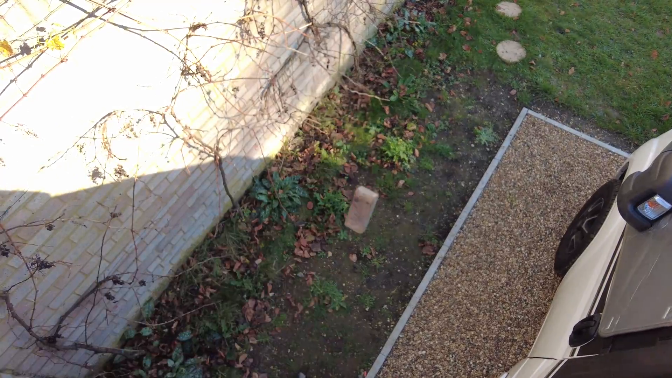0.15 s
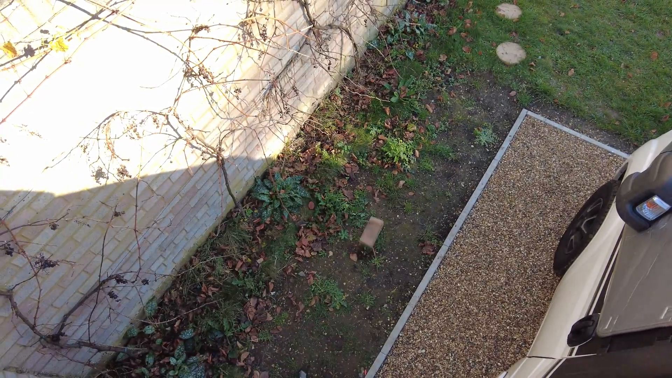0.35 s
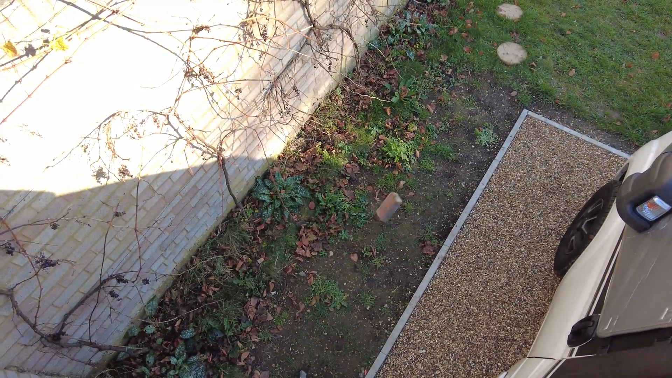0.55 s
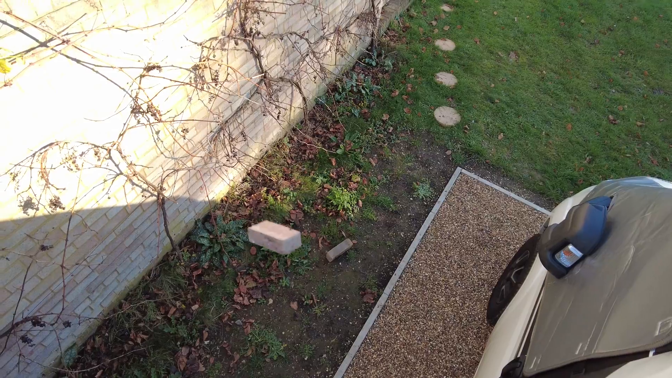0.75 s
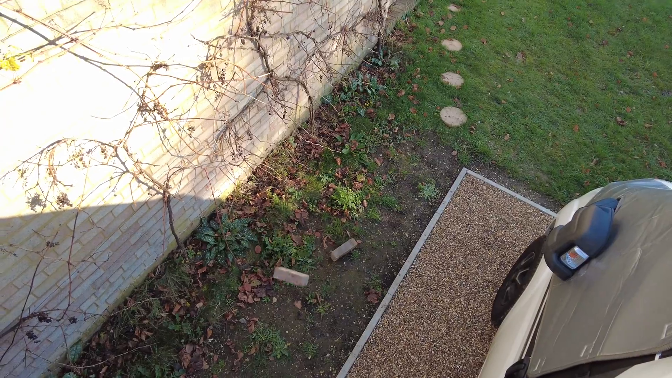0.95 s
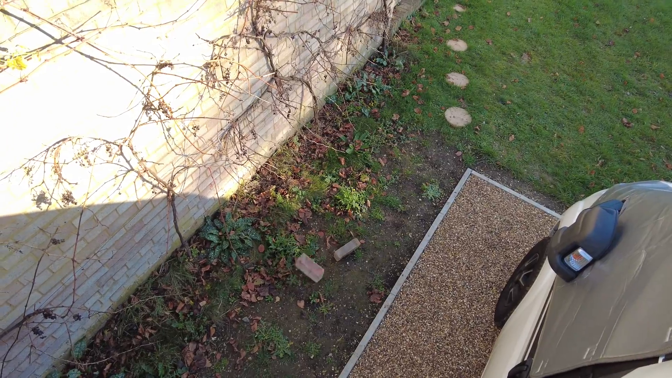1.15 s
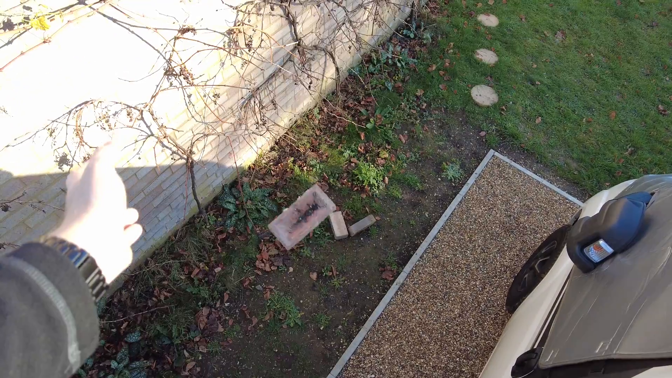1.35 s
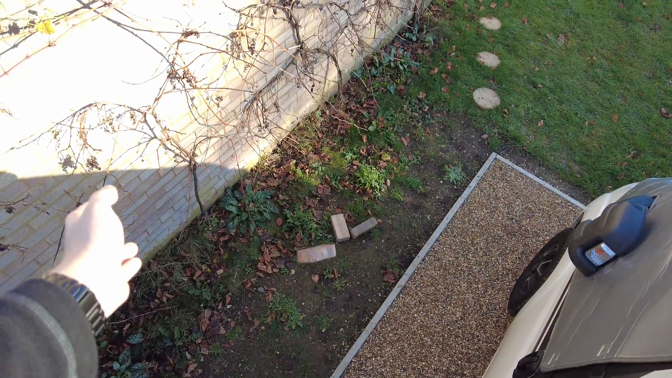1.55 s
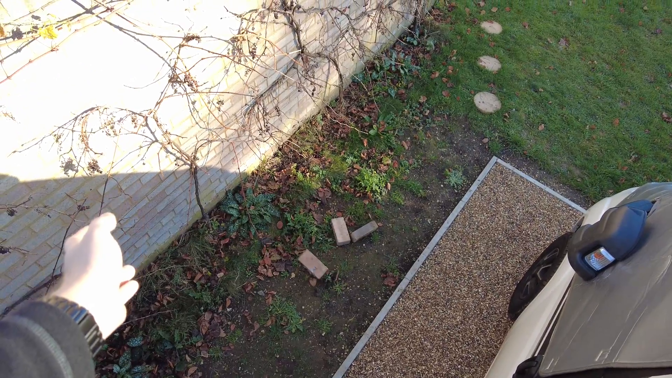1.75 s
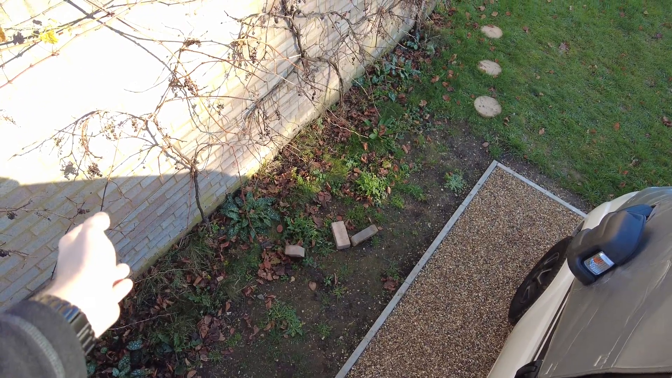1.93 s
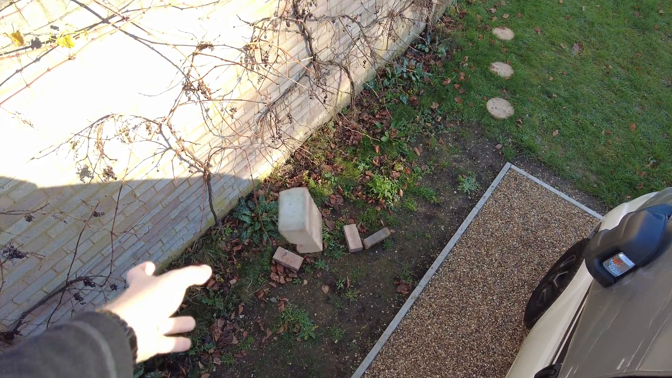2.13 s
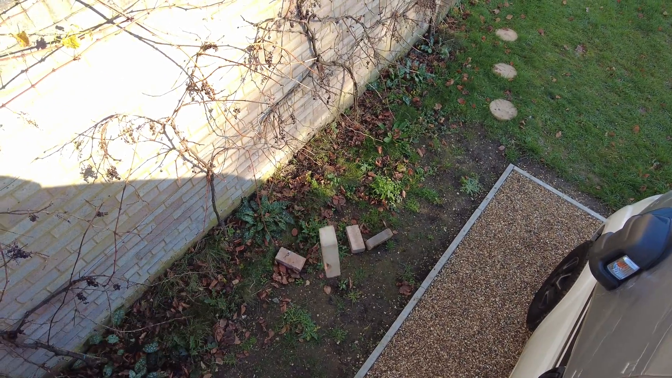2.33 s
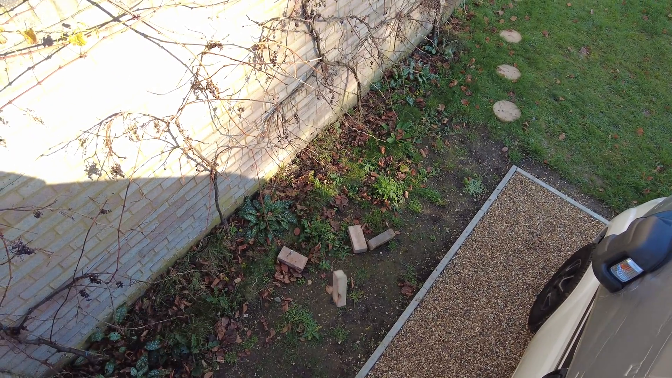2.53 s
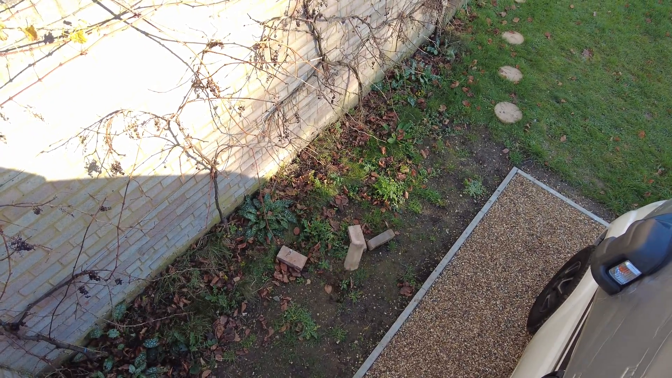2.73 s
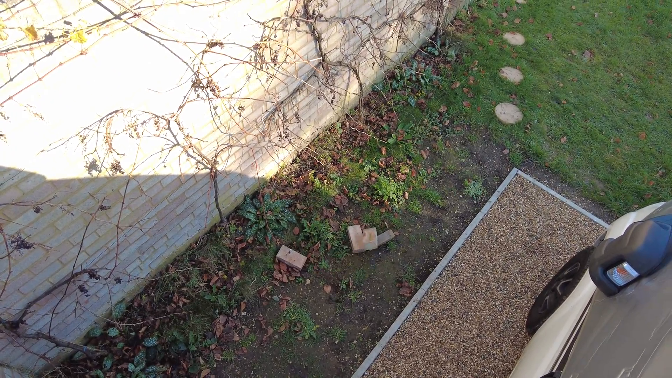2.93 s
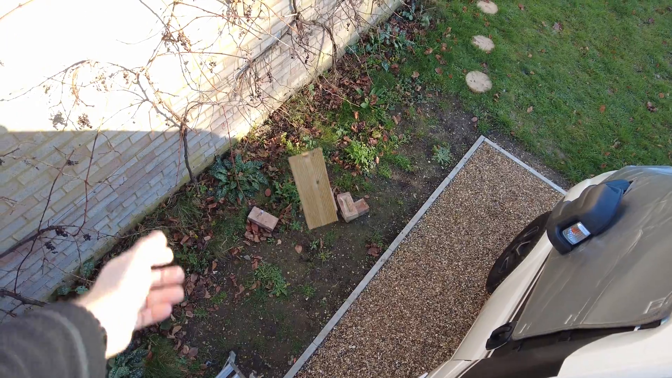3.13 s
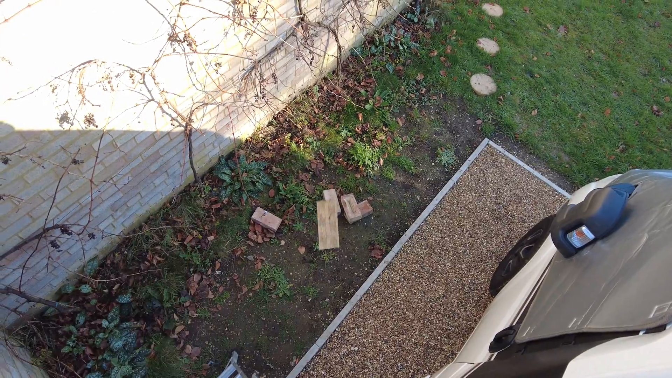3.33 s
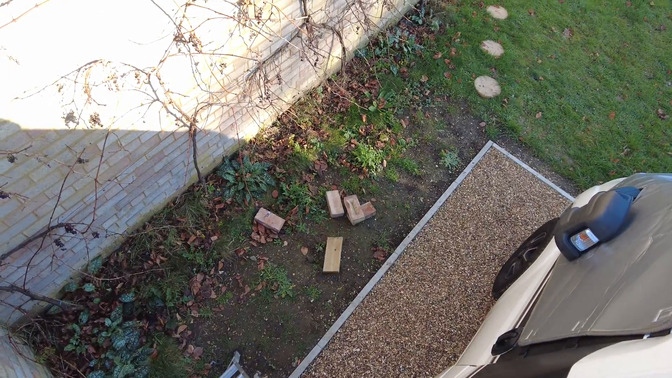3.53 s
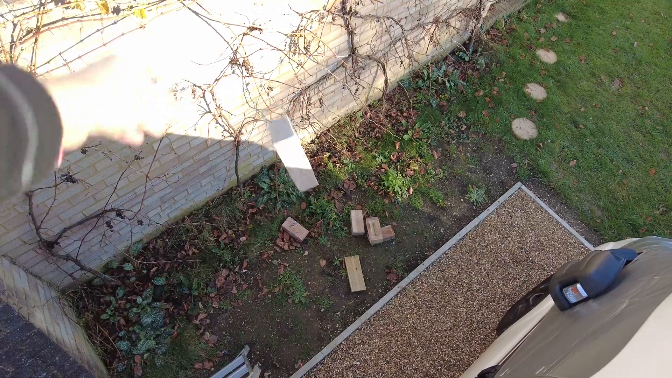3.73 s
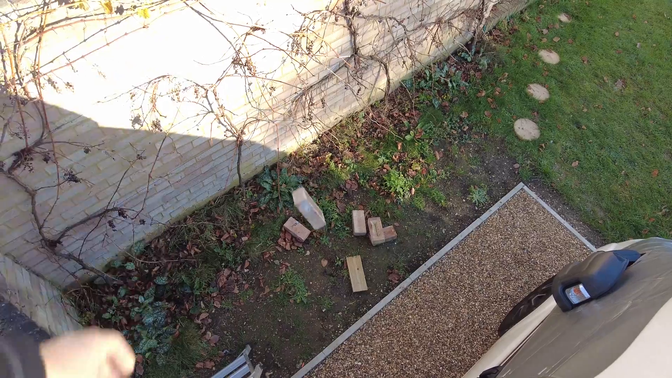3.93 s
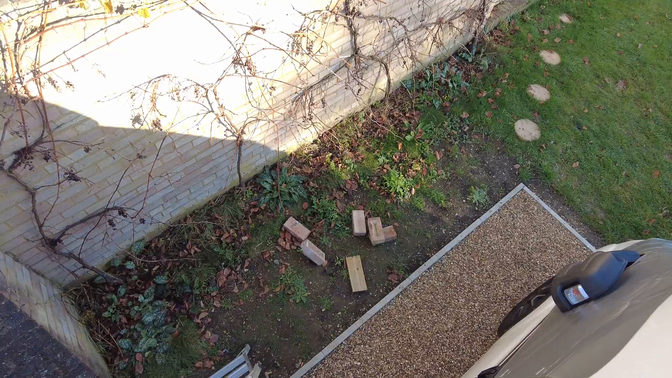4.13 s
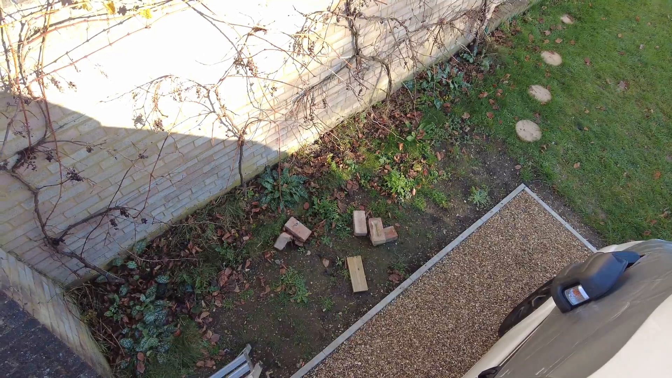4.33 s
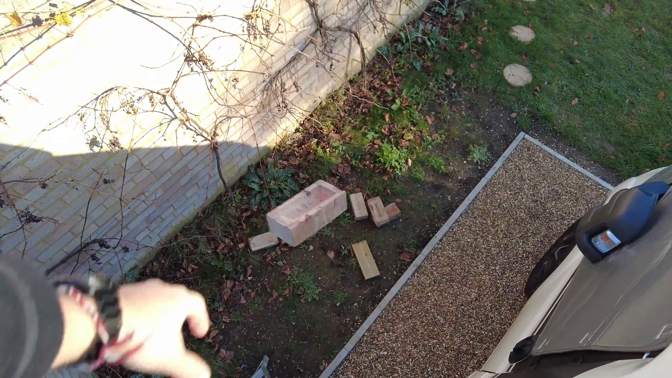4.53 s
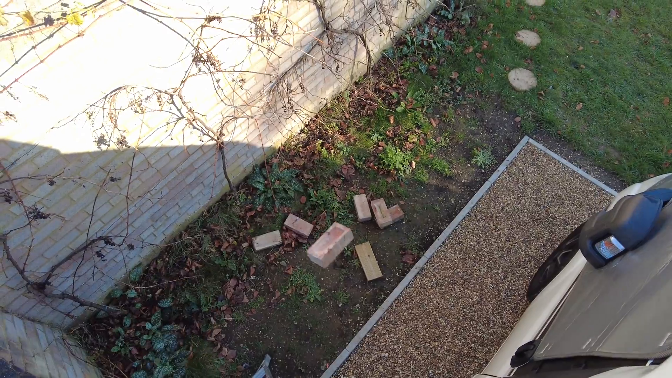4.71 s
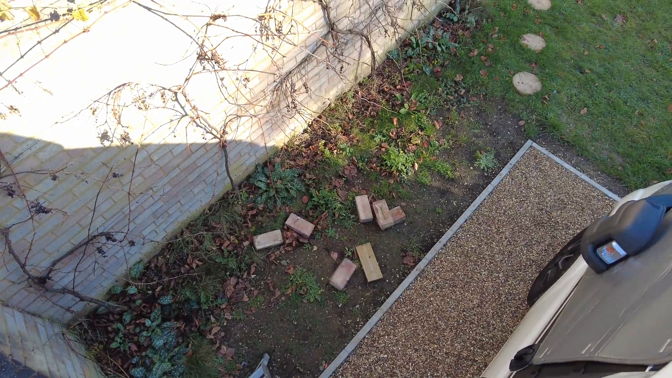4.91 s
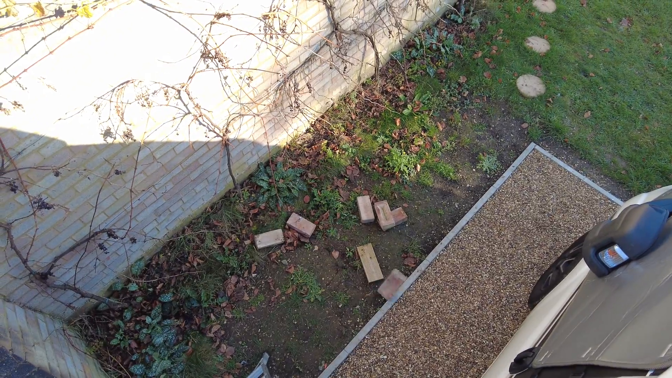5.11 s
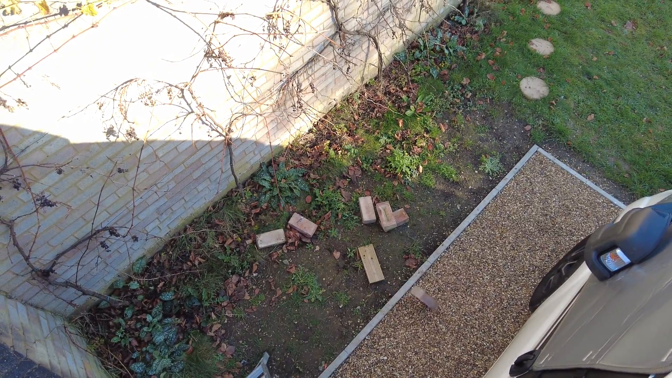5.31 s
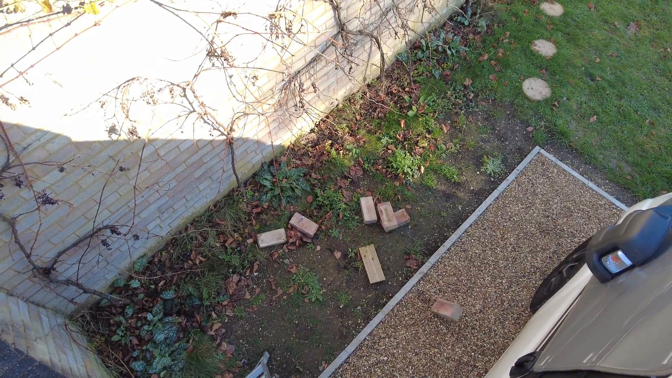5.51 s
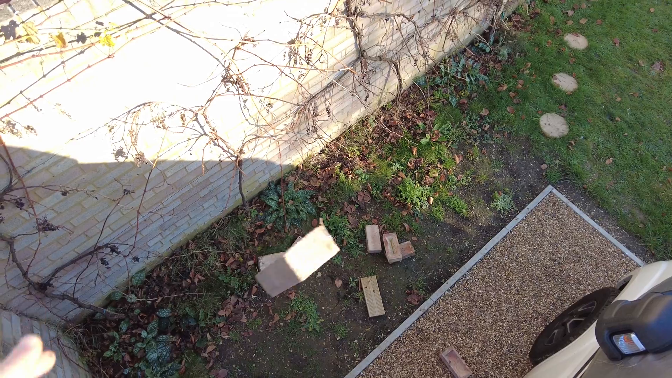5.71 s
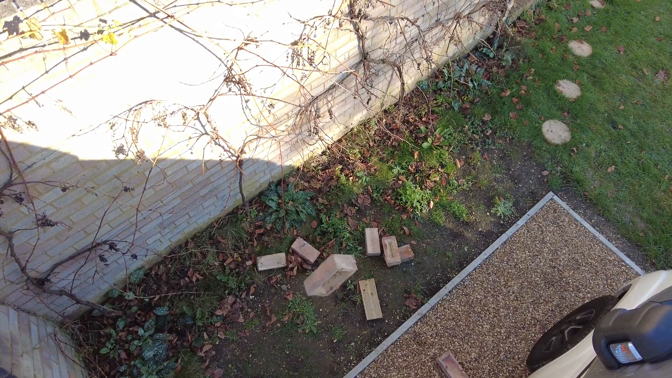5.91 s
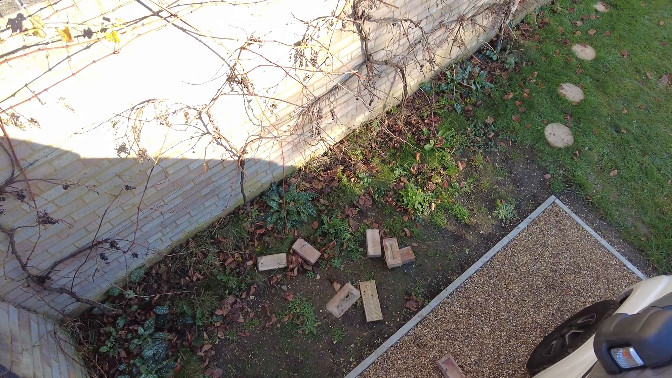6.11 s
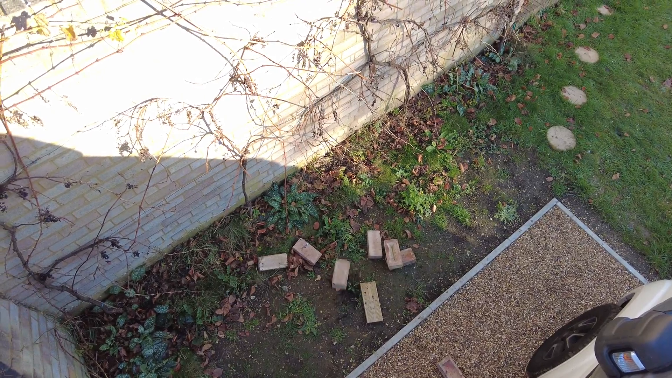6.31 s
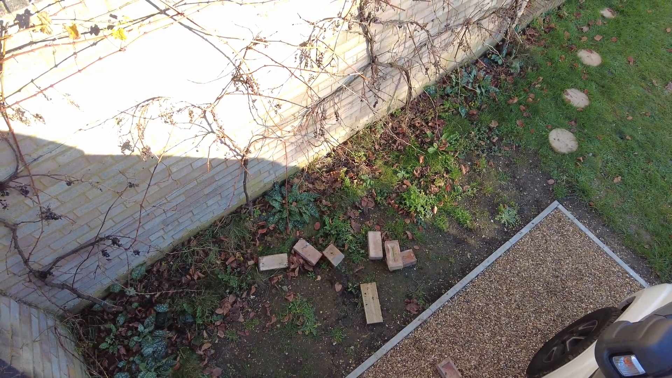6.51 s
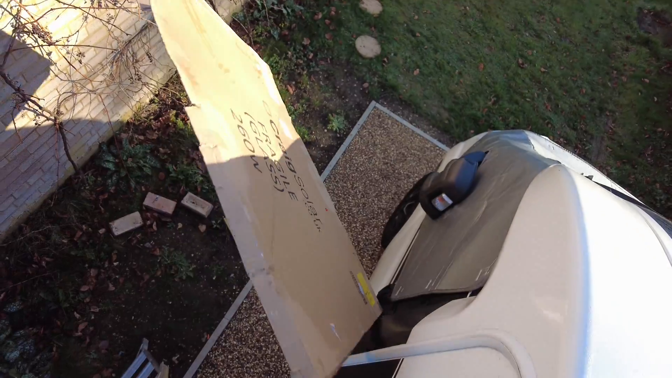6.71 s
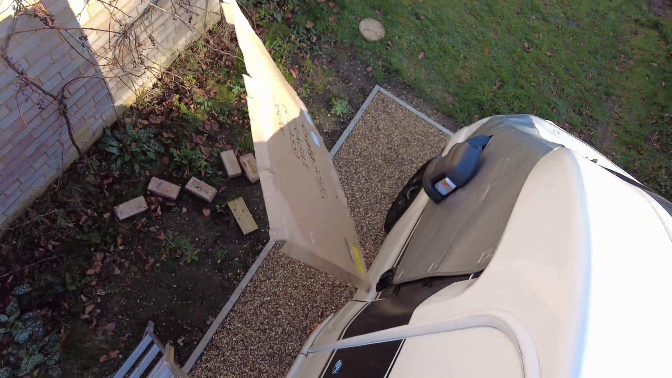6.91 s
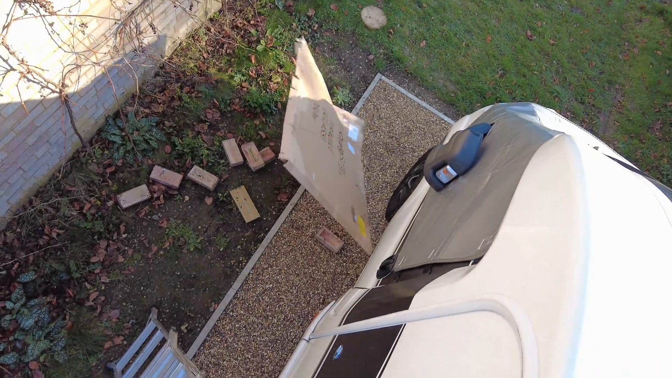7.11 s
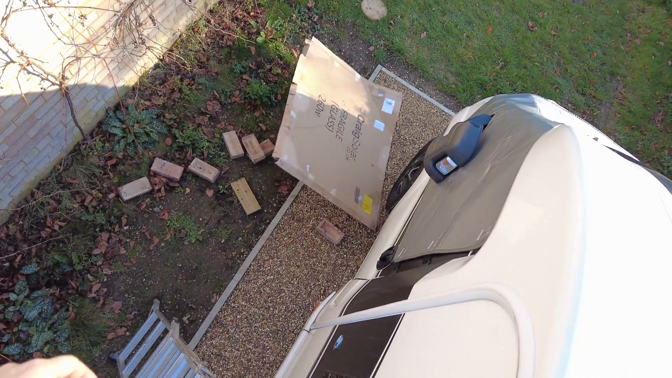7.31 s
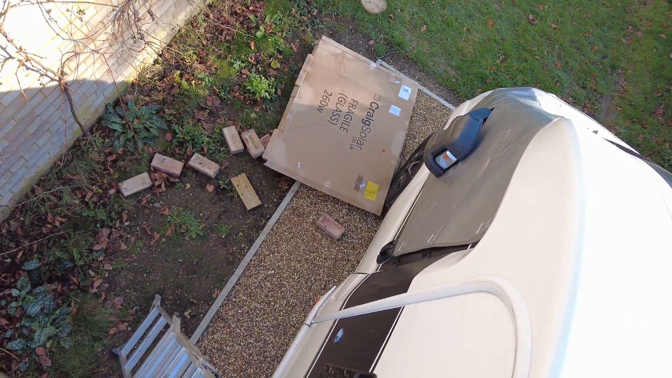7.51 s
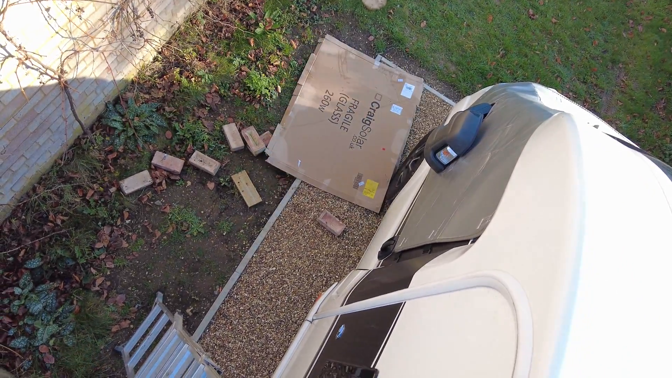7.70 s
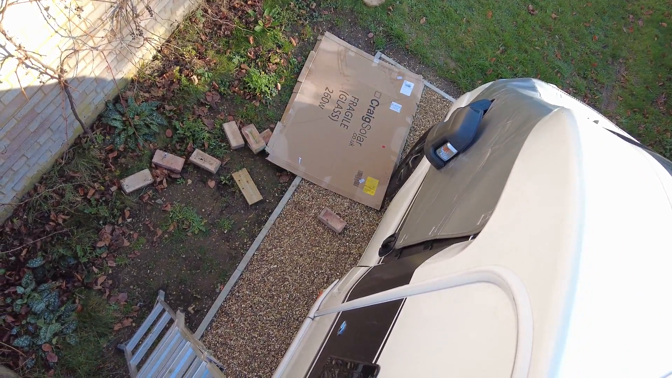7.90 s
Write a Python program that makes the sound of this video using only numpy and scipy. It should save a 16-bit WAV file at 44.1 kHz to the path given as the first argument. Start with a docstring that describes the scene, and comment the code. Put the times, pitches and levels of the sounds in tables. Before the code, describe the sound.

Bricks and a timber piece thud onto soil one after another with clinks, under buffeting wind, then a big cardboard sheet slaps down on gravel.

```python
"""Yard below a roof: bricks, a piece of timber and a big cardboard sheet land on soil and gravel, in hard-cut shots.
Landings are swinging thumps plus coloured grain bursts for slap and grit; hard contacts ring each brick's own modes.
Gravel sprays and the sheet are shaped grains with ticks or panel modes; yard walls add a short echo.
Wind noise that brightens with level buffets over a drone, traffic and hiss; the loudest peaks clip."""
import sys
import numpy as np
from scipy import signal
from scipy.fft import rfft, irfft, next_fast_len
from scipy.io import wavfile
from scipy.ndimage import uniform_filter1d

SR = 44100
rng = np.random.default_rng(int(sys.argv[2]) if len(sys.argv) > 2 else 0)


def output_pcm(signal):
    """Save a mono or channel-first signal as 16-bit PCM at the path in sys.argv[1].

    Samples are clipped to [-1, 1] before scaling.
    """
    pcm = np.clip(np.atleast_2d(signal).T, -1, 1) * 32767
    wavfile.write(sys.argv[1], SR, np.round(pcm).astype(np.int16))


N = 350771
T = np.arange(N) / SR
AGE = T[:SR]  # s since a blow, up to 1 s
TOP_HZ = 15900

# hard cuts between shots: cut_s
CUTS_S = [0.701, 1.319, 2.125, 3.035, 3.735, 4.568, 5.685, 6.63]
SHOT = np.searchsorted(CUTS_S, T)  # shot index of each sample


def undb(db):
    """Decibels to gain."""
    return 10 ** (np.asarray(db) / 20)


def unit(x):
    """Scale to rms 1."""
    return x / np.sqrt(np.mean(x ** 2))


def fade(t60_s, rise_s=0.00088):
    """Quick rise, then exponential decay."""
    rise = 1 - np.exp(-AGE / rise_s)
    return rise * np.exp(-np.log(1000) * AGE / t60_s)


def swell(start_s, hold_s, rise_s, fall_s):
    """Exponential growth up to the start, a hold, exponential decay."""
    before_s = np.minimum(T - start_s, 0)
    after_s = np.maximum(T - start_s - hold_s, 0)
    return np.exp(before_s / rise_s - after_s / fall_s)


def colour(x, points):
    """Filter by (hz, db) points, rolling off below the first; rms 1."""
    size = next_fast_len(x.shape[-1])
    hz, db = np.transpose(points)
    f = np.maximum(np.fft.rfftfreq(size, 1 / SR), 1)
    gain = undb(np.interp(np.log(f), np.log(hz), db))
    gain = gain / np.sqrt(1 + (hz[0] / f) ** 4)
    return unit(irfft(rfft(x, size) * gain, size)[..., :x.shape[-1]])


def grains(size, spread_db=4.5, clump_db=0., side=0.44, side_hz=2400, clump_samples=48):
    """Stereo stream of tiny uneven impacts in clumps; mainly the treble differs between the ears."""
    clumps = np.minimum(rng.exponential(size=size // clump_samples + 1), 5)
    clumps = np.repeat(clumps, clump_samples)[:size]
    strength_db = spread_db * np.minimum(rng.exponential(size=size), 2 * np.pi) + clump_db * clumps
    mid, apart = rng.standard_normal((2, size)) * undb(strength_db)
    apart = signal.lfilter(*signal.butter(1, side_hz, "high", fs=SR), apart)
    return unit(mid + side * np.array([apart, -apart]))


def pebbles(size, per_s=260., low_hz=1800, high_hz=14000, t60_s=.025, spread_db=2.5, ear_phase=0.81):
    """Lone decaying sine ticks of small stones or dry leaves, random in pitch, strength and ear phase."""
    count = int(per_s * size / SR) + 1
    tick_age = AGE[:SR // 20]
    decay = fade(t60_s, rise_s=0.00025)[:len(tick_age)]
    out = np.zeros((2, size + len(tick_age)))
    for when, pitch, chance, place in rng.random((count, 4)):
        hz = min(low_hz * (high_hz / low_hz) ** pitch, TOP_HZ)
        phase = 2 * ear_phase * (place - .5) * np.array([[2], [-2]])
        strength = undb(-spread_db * np.log(max(chance, .02)))
        tick = strength * decay * np.sin(2 * np.pi * hz * tick_age + phase)
        start = int(when * size)
        out[:, start:start + len(tick_age)] += tick
    return unit(out[:, :size])


def hollow(x, low_hz, high_hz, t60_s, order):
    """Ring a signal through modes scattered between two frequencies; rms 1."""
    scatter = rng.uniform(-0.52, 0.529, order) / order
    hz = np.geomspace(low_hz, high_hz, order) * (high_hz / low_hz) ** scatter
    modes = np.sin(2 * np.pi * hz[:, None] * AGE[:SR // 10]).sum(axis=0)
    modes = modes * fade(t60_s)[:SR // 10]
    return unit(signal.fftconvolve(x, modes[None], mode="same", axes=1))


def walk(rate_hz):
    """Smooth random wander at rms 1."""
    k = int(SR / rate_hz)
    held = np.repeat(rng.standard_normal(N // k + 1), k)
    return unit(uniform_filter1d(uniform_filter1d(held, k), k)[:N])


def add(out, start_s, sound):
    """Mix a sound in; it stops dead at the next cut."""
    start = int(start_s * SR)
    end = min([int(c * SR) for c in CUTS_S if c > start_s] + [N, start + SR])
    out[:, start:end] += sound[..., :end - start]


# background per shot: breeze_db, traffic_db, hiss_db, drone_start_hz, drone_db
SHOTS = [ (-16.5, -52, -58, 340, -45.5), (-33, -44, -58.5, 335, -42), (-34.5, -45, -66, 200, -33.5),
         (-30.5, -46.5, -62, 215, -45.5), (-28.5, -45, -67.5, 230, -40), (-35.5, -43, -61, 148, -37),
         (-38, -44.5, -60.5, 150, -42.5), (-27, -38.5, -68.5, 110, -38), (-31, -30.5, -65, 92, -27)]
# wind gusts: start_s, hold_s, level_db
GUSTS = [(0.092, .6, -15), (0.337, 0.12, -7.5), (1.121, 0.26, -10), (2.124, .29, -21.5),
         (2.693, .42, -27.5), (3.48, 0.27, -19), (4.13, 0.23, -26.5), (5.69, 0.074, -23.5)]
GUST_RISE_S, GUST_FALL_S = 0.031, 0.033
# sudden wind buffets: start_s, level_db
BUFFETS = [(0.101, -10.5), (0.174, -9.5), (0.215, -3.5), (0.236, -3.5), (0.377, -0.5), (0.622, -9),
           (0.674, 2), (1.178, -9), (1.248, -3.5), (3.485, -13.5), (4.575, -18)]
# buffet spectrum: freq_hz, level_db
BUFFET_SPECTRUM = [(60, 0), (150, 4.5), (300, -2), (600, -20), (1200, -54), (3000, -54), (9000, -71)]


def wind(corner_hz=130, corner_oct_per_db=0.1039, slope=6.36, flutter_db=4.0, apart_db=-31):
    """Eddies on the microphone: a stronger gust holds smaller eddies and reaches higher in pitch."""
    levels = [undb(np.array(SHOTS)[SHOT, 0])]
    for start_s, hold_s, gust_db in GUSTS:
        same_shot = SHOT == np.searchsorted(CUTS_S, start_s)
        levels.append(undb(gust_db) * swell(start_s, hold_s, GUST_RISE_S, GUST_FALL_S) * same_shot)
    db = 20 * np.log10(np.linalg.norm(levels, axis=0))
    eddies = walk(45)
    corner = corner_hz * 2 ** (corner_oct_per_db * (db + 15.0 + flutter_db * eddies))
    out, power = 0, 0
    for hz in 25 * np.sqrt(2) ** np.arange(14):  # half-octave bands
        edges_hz = [hz / 2 ** .25, hz * 2 ** .25]
        sos = signal.butter(2, edges_hz, "band", fs=SR, output="sos")
        band = signal.sosfilt(sos, rng.standard_normal(N))
        share = hz / (1 + (hz / corner) ** slope)
        out = out + np.sqrt(share) * unit(band)
        power = power + share
    out = (out / np.sqrt(power) * undb(db + 2.2 * eddies))[None]
    for start_s, buffet_db in BUFFETS:
        buffet = colour(rng.standard_normal(SR), BUFFET_SPECTRUM) * fade(0.18, rise_s=0.0016)
        add(out, start_s, undb(buffet_db) * buffet)
    # small eddies, opposite in the two ears
    apart = undb(db + apart_db) * colour(rng.standard_normal(N), BUFFET_SPECTRUM)
    return out + np.array([apart, -apart])


# one growth of the drone: start_s, hold_s, gain_db
DRONE_SWELL = (1.555, 0.09, 9)
DRONE_SAG_OCTAVES_PER_S = .25
# air and leaves stirred by the sheet: start_s, hold_s, level_db
RUSTLE = (6.574, 0.92, -45)
RUSTLE_RISE_S, RUSTLE_FALL_S = 0.23, 0.24
RUSH_DB = 8.5  # low rush of air over the rustle
# spectra: freq_hz, level_db
TRAFFIC_SPECTRUM = [(70, -8.5), (115, 1.5), (260, 4), (450, -5), (750, -11), (1250, -12.5), (2000, -21),
                    (3500, -32.5), (9000, -50)]
HISS_SPECTRUM = [(800, -18.5), (2000, 4.5), (4500, 2), (7000, -2.5), (10000, -5), (16000, -15)]


def distance(width_hz=90, leaves_db=-10):
    """Wavering engine drone sinking within each shot, traffic wash, leafy hiss; the sheet stirs up more."""
    _, traffic_db, hiss_db, start_hz, drone_db = np.array(SHOTS)[SHOT].T
    shot_age_s = T - np.array([0] + CUTS_S)[SHOT]
    hz = start_hz * 2 ** (-DRONE_SAG_OCTAVES_PER_S * shot_age_s)
    start_s, hold_s, gain_db = DRONE_SWELL
    drone_db = drone_db + gain_db * swell(start_s, hold_s, rise_s=.07, fall_s=0.04)
    waver = walk(width_hz) + 1j * walk(width_hz)
    drone = unit(np.real(waver * np.exp(2j * np.pi * np.cumsum(hz) / SR)))

    start_s, hold_s, rustle_db = RUSTLE
    stir = undb(rustle_db) * swell(start_s, hold_s, RUSTLE_RISE_S, RUSTLE_FALL_S)
    traffic = colour(grains(N, spread_db=0.0, side=0.31, side_hz=900), TRAFFIC_SPECTRUM)
    traffic = traffic * np.hypot(undb(traffic_db), undb(RUSH_DB) * stir) * undb(1.0 * walk(9))

    leaves = pebbles(N, per_s=180.0, low_hz=2700, high_hz=11300, t60_s=0.055, spread_db=8.0)
    hiss = colour(grains(N, spread_db=3.0), HISS_SPECTRUM) + undb(leaves_db) * leaves
    hiss = hiss * np.hypot(undb(hiss_db), stir) * undb(1.0 * walk(10.0))
    return drone * undb(drone_db) + traffic + hiss


# landings: start_s, contact, thump_db, slap_db, slap_hz
LANDINGS = [ (0.403, "brick on soil", -3, -9, 822), (0.463, "brick on soil", -2.5, -11, 720),
            (1.083, "brick on soil", -0.5, -2, 1064), (1.753, "brick on soil", -0.5, -14.5, 1030),
            (2.661, "brick on soil", 2, -8.5, 1699), (2.909, "brick on brick", -9, 0, 789.5),
            (2.914, "brick on soil", -15, -21, 690), (2.996, "brick on brick", -32, -18.5, 700),
            (3.019, "brick on brick", -22.5, -17, 1337), (3.552, "timber", -20, -1.5, 728),
            (3.577, "timber", -3.5, 5, 832.4), (3.591, "timber", -16.5, -19, 900),
            (4.234, "brick on soil", -8.5, -15, 1740), (4.251, "brick on soil", -4, -5.5, 1390),
            (4.986, "brick end on soil", -1, -14, 1086), (4.994, "brick on soil", -7, -18.5, 1456),
            (5.206, "brick on edging", 3, -11, 621), (5.281, "brick on edging", 9, -16.5, 925),
            (5.302, "brick on edging", -11, -26, 900), (5.5, "brick on edging", -29, -32, 800),
            (6.251, "brick on soil", -4, -9, 900), (6.265, "brick on soil", -1.5, -3, 728),
            (7.171, "sheet on gravel", -19, -6.5, 1727), (7.225, "sheet on gravel", -7.5, -5, 1236)]
# what meets what, by contact: thump_hz, thump_t60_s, grit_db (relative to slap)
CONTACTS = { "brick on soil": (104, 0.14, -8.5), "brick end on soil": (193.5, 0.071, -4),
            "brick on brick": (760, .09, -10), "timber": (1130, 0.061, -20),
            "brick on edging": (425, 0.018, -8), "sheet on gravel": (400, 0.077, -17.5)}
# slap spectrum: multiple of slap_hz, level_db
SLAP_SPECTRUM = [(.15, -16.5), (.45, -1.5), (.8, -4), (1.2, -1.5), (1.8, -10.5), (3.2, -16), (7, -25),
                 (18, -47.5)]
# grit spectrum: freq_hz, level_db
GRIT_SPECTRUM = [(500, -21), (1500, 3.5), (3000, 2.5), (5500, 2), (8000, 1), (12000, -2.5), (16000, -3.5)]
GRIT_DB_PER_OCTAVE, GRIT_REF_HZ = 16, 1010  # a sharper blow slaps higher and crushes more grit


def landings(slap_t60_s=0.036, grit_t60_s=0.039, tail_db=-20, tail_t60_s=0.17, overtone=1.7,
             overtone_db=-8, shudder_db=-14, knock_db=-7, knock_t60_s=0.075):
    """Ground gives and swings back under the weight; the flat face slaps, knocks hollow and crushes grit."""
    out = np.zeros((2, N))
    for start_s, contact, thump_db, slap_db, slap_hz in LANDINGS:
        hz, t60_s, loose_db = CONTACTS[contact]
        grit_db = slap_db + loose_db + GRIT_DB_PER_OCTAVE * np.log2(slap_hz / GRIT_REF_HZ)
        tail = undb(tail_db) * fade(tail_t60_s, rise_s=0.0039)

        swing = np.sin(2 * np.pi * hz * AGE)
        swing = swing + undb(overtone_db) * np.sin(2 * np.pi * overtone * hz * AGE)
        shudder = colour(grains(SR), [(hz / 3, -3), (hz, 0), (hz * 2, -6), (hz * 8, -50)])
        thump = (undb(shudder_db) * shudder - swing) * fade(t60_s, rise_s=0.00018)

        face = [(k * slap_hz, db) for k, db in SLAP_SPECTRUM]
        crush = grains(SR, spread_db=2, clump_db=1.5)
        knock = undb(knock_db) * hollow(crush, .7 * slap_hz, 3.2 * slap_hz, knock_t60_s, order=7)
        slap = colour(crush + knock, face) * (fade(slap_t60_s, rise_s=0.00057) + tail)

        grit = colour(grains(SR, spread_db=3.0, clump_db=1.0), GRIT_SPECTRUM)
        grit = grit * (fade(grit_t60_s, rise_s=0.0017) + tail)
        add(out, start_s, undb(thump_db) * thump + undb(slap_db) * slap + undb(grit_db) * grit)
    return out


# hard contacts: start_s, brick, level_db, bright_db_per_octave, t60_factor (a pinned brick rings shorter)
CLINKS = [ (0.469, "first", -17, -1.5, 1), (1.088, "second", -25, -5.5, 0.89),
          (2.665, "third", -11.5, 5.5, 1.1), (2.912, "third", 9, -6, 0.87), (2.999, "third", -35, 12, 1.1),
          (3.02, "third", -20, 12.5, 0.83), (4.252, "fourth", -3.5, -4.5, 0.84),
          (5.205, "fifth", -18, -1.5, 0.8), (5.3, "fifth", -20, -3, 0.62), (6.253, "sixth", -27, 3, 0.76),
          (6.267, "sixth", -24, 4.5, .95)]
# modes by brick: mode_hz, mode_db, t60_s (before t60_factor)
BRICK_MODES = { "first": [(2270, -18.5, 0.14), (2564, -3, 0.051), (6293, -17, 0.15), (7580, -20, 0.15),
               (10860, -11, 0.062)], "second": [(2615, 2, 0.26), (3120, -4, 0.13), (5690, 3, 0.16),
               (7700, 7, 0.075)], "third": [(2299, -4.5, .11), (2295, -17, .26), (2850, -21.5, 0.14),
               (3770, -21, 0.16), (4930, -21.5, 0.096), (5360, -19.5, 0.095), (5860, -25.5, 0.081),
               (6830, -23, 0.053), (7620, -22.5, 0.11)], "fourth": [(2780, -7.5, 0.076), (3190, 2.5, 0.068),
               (4660, -10, 0.13), (6200, -8.5, 0.079), (6570, -9.5, .07)], "fifth": [(2560, -4, 0.18),
               (2760, 4.5, 0.049), (4130, -10.5, 0.15), (5400, -6.5, 0.073), (5930, -6, 0.051),
               (6900, -22, 0.14), (7830, -13.5, 0.16)], "sixth": [(2780, -5, 0.24), (3000, 16, 0.021),
               (4680, 2, 0.08), (6270, 1, 0.044), (9400, -21, 0.16)]}


def clinks(ear_phase=0.35, chatter_db=-8.5, chatter_t60_s=.016):
    """A hard contact and brief chatter of rough faces ring the brick's modes, each leading in one ear."""
    out = np.zeros((2, N))
    for start_s, brick, db, bright_db, t60_factor in CLINKS + skitter():
        modes = BRICK_MODES[brick]
        ring = 0
        for hz, mode_db, t60_s in modes:
            octaves = np.log2(hz / modes[0][0])
            lead = ear_phase * (1 + .5 * octaves) * rng.choice([-1, 1])
            phase = lead * np.array([[1], [-1]])
            tone = np.sin(2 * np.pi * hz * AGE + phase) * fade(t60_s * t60_factor, rise_s=.00075)
            ring = ring + undb(mode_db + bright_db * octaves) * tone
        chatter = rng.standard_normal(SR) * fade(chatter_t60_s)
        chatter = undb(chatter_db) * chatter / np.linalg.norm(chatter)
        rattle = signal.fftconvolve(ring, chatter[None])[:, :SR]
        add(out, start_s, undb(db) * (ring + rattle))
    return out


# loose stones, crumbs, leaves: start_s, level_db, t60_s, bright_db_per_octave
SPRAYS = [ (1.912, -36, 0.46, -2.5), (2.692, -35.5, 0.23, -6.5), (4.265, -28.5, 0.49, -2),
          (5.301, -17, 0.072, 9), (5.372, -34, 0.29, 0.5), (5.422, -35.5, 0.34, 5),
          (6.638, -23.5, 0.21, -6.5), (7.143, -22.5, 0.18, -4), (7.165, -13.5, 0.21, 0.5),
          (7.392, -18.5, 0.058, 7.5), (7.53, -35, 0.68, 9)]
TRICKLE_DB, TRICKLE_T60_FACTOR = -15.5, 6.6  # stragglers after a spray


def sprays(crumbs_db=-2, stones_db=-7.5):
    """Thrown-up crumbs hiss back down among ticking stones, each spray with its own spectral tilt."""
    out = np.zeros((2, N))
    for start_s, db, t60_s, bright_db in SPRAYS:
        low_hz = GRIT_SPECTRUM[0][0]
        spectrum = [(hz, level + bright_db * np.log2(hz / low_hz)) for hz, level in GRIT_SPECTRUM]
        crumbs = colour(grains(SR, spread_db=2.5, clump_db=0.0, side=.82, side_hz=900), spectrum)
        stones = pebbles(SR, per_s=390.0, t60_s=0.024)
        trickle = undb(TRICKLE_DB) * fade(TRICKLE_T60_FACTOR * t60_s, rise_s=0.042)
        shower = fade(t60_s, rise_s=0.0015) + trickle
        add(out, start_s, undb(db) * (undb(crumbs_db) * crumbs + undb(stones_db) * stones) * shower)
    return out


# the fifth brick skitters on over gravel
SKITTER_S, SKITTER_GAP_S, SKITTER_DB = 5.36, .038, -42.5
SKITTER_BRIGHT_DB_PER_OCTAVE, SKITTER_T60_FACTOR = -6, 1.45


def skitter(count=9, uneven=0.39, spread_db=1.5, bright_spread_db=4):
    """Light uneven taps of a tumbling brick, as rows for clinks, none past the shot's end."""
    end_s = min(c for c in CUTS_S if c > SKITTER_S)
    taps = []
    for k, (late, hard, sharp) in enumerate(rng.standard_normal((count, 3))):
        start_s = SKITTER_S + SKITTER_GAP_S * (k + uneven * late)
        level_db = SKITTER_DB + spread_db * hard
        bright_db = SKITTER_BRIGHT_DB_PER_OCTAVE + bright_spread_db * sharp
        if start_s < end_s:
            taps.append((start_s, "fifth", level_db, bright_db, SKITTER_T60_FACTOR))
    return taps


# blows on the sheet: start_s, level_db, t60_s
FLAPS = [(6.632, -15.5, 0.15), (7.143, -15.5, 0.94), (7.167, -5.5, 0.84), (7.212, -0.5, 0.24),
         (7.324, -13, 0.33), (7.541, -10, 0.12), (7.589, -16, 0.17), (7.833, -21, 0.13)]
# cardboard spectrum: freq_hz, level_db
CARDBOARD_SPECTRUM = [(150, 0.5), (240, -8), (340, -0.5), (460, 1.5), (620, -3), (800, -13.5),
                      (1300, -10.5), (2100, -16.5), (3200, -28), (4500, -52), (12000, -33), (16000, -35)]


def cardboard(panel_db=-3, panel_t60_s=0.083):
    """The sheet buckles and slaps down; crumpling drives panel modes redrawn at each blow."""
    out = np.zeros((2, N))
    for start_s, db, t60_s in FLAPS:
        crumple = grains(SR, spread_db=3, clump_db=3.5, side=0.22, side_hz=620)
        panel = undb(panel_db) * hollow(crumple, 298.7, 4005, panel_t60_s, order=26)
        flap = colour(crumple + panel, CARDBOARD_SPECTRUM) * fade(t60_s, rise_s=0.0027)
        add(out, start_s, undb(db) * flap)
    return out


def yard(x, wet_db=-19, t60_s=0.14):
    """House and garden walls return a short, thin echo, which ends with its shot."""
    walls = [(200, 0), (1000, -8.0), (5000, -8.0), (15000, -8.5)]  # freq_hz, level_db
    echo = colour(grains(SR, spread_db=5, clump_db=4.5, side=0.49, side_hz=450), walls)
    echo = echo * fade(t60_s, rise_s=0.029)
    echo = echo / np.linalg.norm(echo[0])
    shots = np.split(x, [int(c * SR) for c in CUTS_S], axis=1)
    wet = [signal.fftconvolve(shot, echo, axes=1)[:, :shot.shape[1]] for shot in shots]
    return x + undb(wet_db) * np.hstack(wet)


def scene(right_db=1.0):
    """Falling things in the yard, clinks and sprays a little to the right, under wind and far noise."""
    lean = undb(np.array([[-right_db], [right_db]]) / 2)
    falling = landings() + cardboard() + lean * (clinks() + sprays())
    return yard(falling) + wind() + distance()


def record(dry):
    """The loudest peaks clip flat; a steep lowpass cuts off the top."""
    lowpass = signal.ellip(8, .2, 70, TOP_HZ, fs=SR, output="sos")
    return signal.sosfilt(lowpass, np.clip(dry, -.98, .98))


dry = scene()
out = record(dry)
output_pcm(out)
```